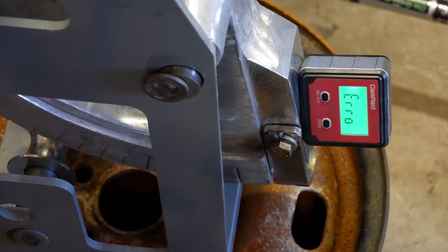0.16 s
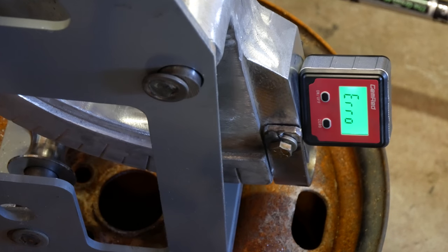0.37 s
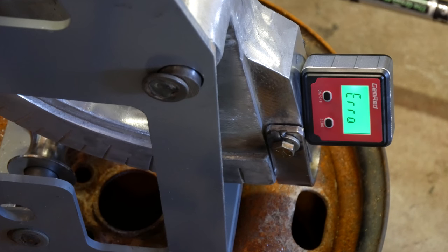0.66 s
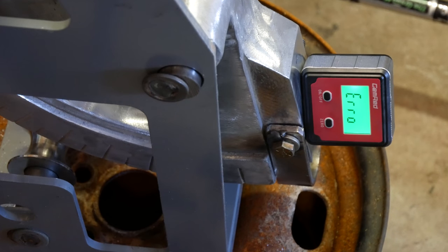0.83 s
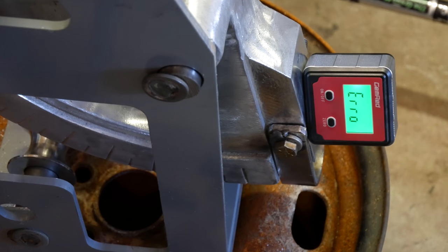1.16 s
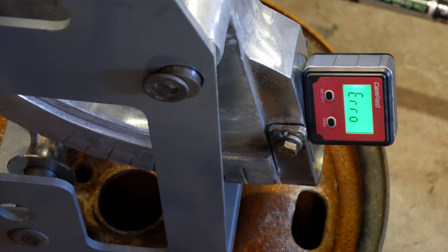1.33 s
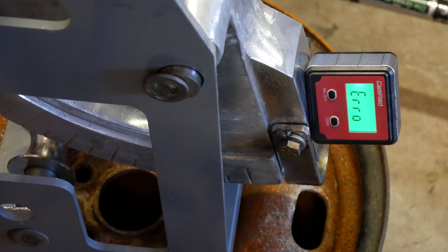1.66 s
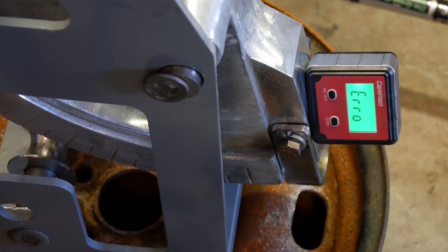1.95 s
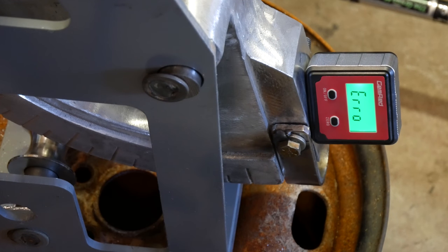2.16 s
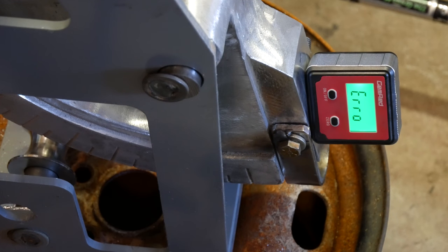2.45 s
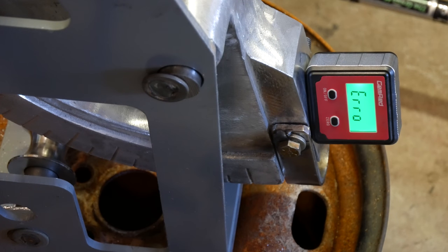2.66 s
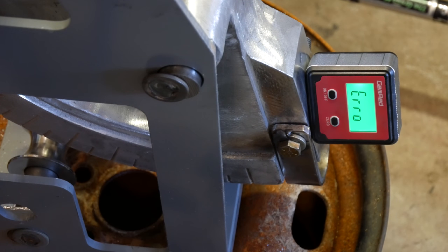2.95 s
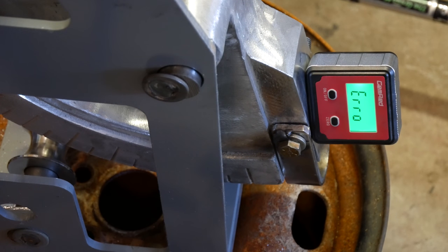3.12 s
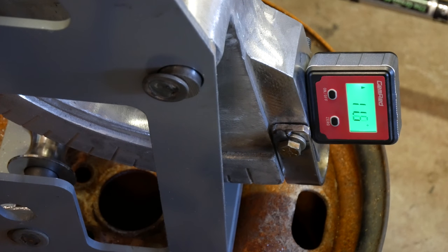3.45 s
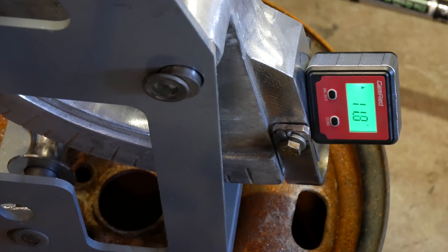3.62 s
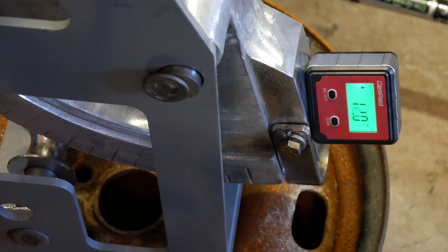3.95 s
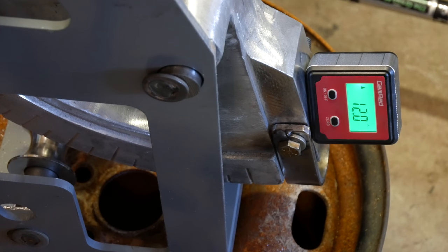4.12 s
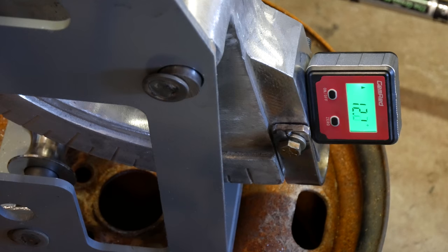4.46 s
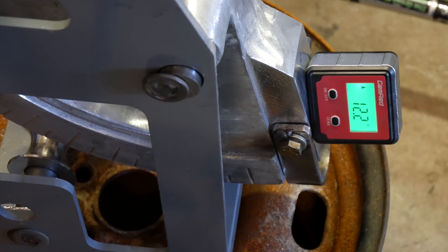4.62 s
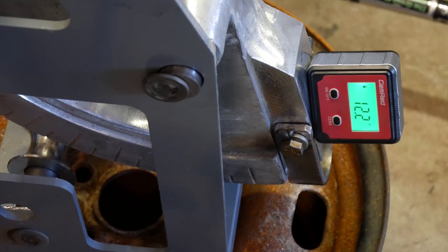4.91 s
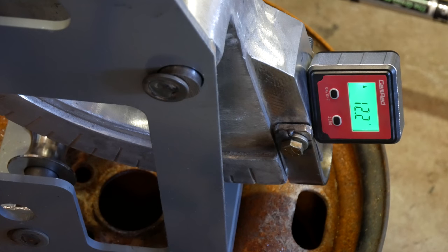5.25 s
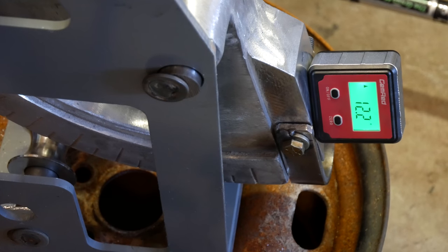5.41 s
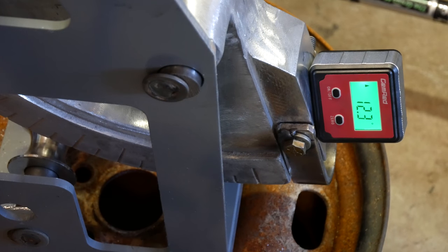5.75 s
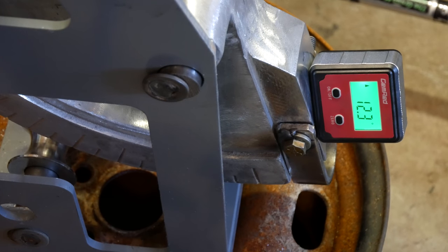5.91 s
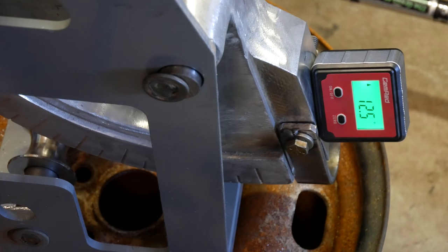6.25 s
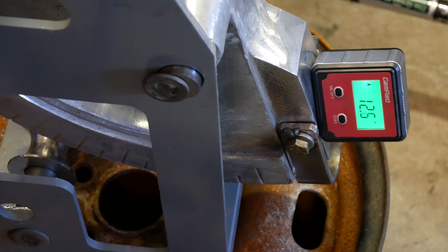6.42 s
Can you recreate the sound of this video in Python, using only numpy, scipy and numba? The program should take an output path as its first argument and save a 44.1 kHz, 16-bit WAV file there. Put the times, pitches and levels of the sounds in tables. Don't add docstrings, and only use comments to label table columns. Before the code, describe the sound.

Phone-close steel linkage: sharp dry knocks around 3 to 4 kilohertz, bright pin ticks, slapping link plates and a thin spring ping, with short room echoes. A brisk burst of pumping comes first, then over two seconds of near-silence with faint sleeve rustle and tiny taps. A loose handle clink restarts the action, and hard stop knocks alternate with lighter return rattles to the end, over low hum and hiss.

```python
import sys
import numpy as np
from scipy import signal
from scipy.io import wavfile
from scipy.ndimage import uniform_filter1d
from numba import njit

SR = 44100
rng = np.random.default_rng(int(sys.argv[2]) if len(sys.argv) > 2 else 0)


def voltage_ratio(decibels):
    exponent = np.asarray(decibels, float) / 20
    return 10 ** exponent


def persist_wave(psi):
    counts = np.round(np.clip(psi, -1, 1) * 32767).astype(np.int16)
    wavfile.write(sys.argv[1], SR, np.atleast_2d(counts).T)


N = 290178
LEAD = 13230


@njit
def ring(rows, size):
    out = np.zeros(size)
    for at, hz, t60, rise, gain, phase in rows:
        z = gain * np.exp(1j * phase)
        p = np.exp(2j * np.pi * hz / SR - np.log(1000) / (t60 * SR))
        lag, q = 1., np.exp(-1 / (rise * SR))
        for i in range(int(at), min(size, int(at + 1.2 * t60 * SR))):
            out[i] += z.imag * (1 - lag) ** 2
            z, lag = z * p, lag * q
    return out


def strike(s, db, modes, scatter_db, detune, rise_s):
    hz, mode_db, t60_s = np.transpose(modes)
    luck = rng.standard_normal((len(s), 3, len(hz)))
    start = s[:, None] * SR + LEAD
    mode_hz = hz * (1 + detune * luck[:, 1])
    gain = voltage_ratio(db + mode_db + scatter_db * luck[:, 0])
    phase = 2 * luck[:, 2]
    columns = np.broadcast_arrays(start, mode_hz, t60_s, rise_s, gain, phase)
    return np.stack(columns, axis=-1).reshape(-1, 6)


def burst(s, db, lo_hz, hi_hz, rise_s, fall_s):
    level = np.zeros(N + LEAD)
    np.add.at(level, (s * SR + LEAD).astype(int), voltage_ratio(db))
    rise, fall = np.exp(-1 / (rise_s * SR)), np.exp(-1 / (fall_s * SR))
    level = signal.lfilter([1], [1, -fall], level)
    level = signal.lfilter([1 - rise], [1, -rise], level)
    return level * band(lo_hz, hi_hz, size=N + LEAD)


def band(lo_hz, hi_hz, size=N):
    sos = signal.butter(2, [lo_hz, hi_hz], "band", fs=SR, output="sos")
    x = signal.sosfilt(sos, rng.standard_normal(size))
    return x / x.std()


def walk(rate_hz):
    k = int(SR / rate_hz)
    held = np.repeat(rng.standard_normal(N // k + 1), k)
    return 0.48 * uniform_filter1d(uniform_filter1d(held, k), k)[:N]


def stop_contacts():
    # t/s, knock peak/dB, rebound delay/s, rebound/dB
    stops = [(-0.0073, -11.5, .005, -22), (0.4918, -7, .0054, -12), (1.0251, -7, .0054, -12),
             (4.8085, -5.5, .005, -26), (5.5692, -7, .0043, -25), (6.2936, -8, .004, -24)]
    touch_colour, stop_colour, rebound_colour = (2.8, 6, -6.5), (-13, -26, -16.5), (-17.5, -25, -27.5)
    rows = []
    for s, db, gap_s, rebound_db in stops:
        rows += [(s - .046, -46.5, *touch_colour, 3500),
                 (s, db, *stop_colour, 3706),
                 (s + gap_s, rebound_db, *rebound_colour, 3600),
                 (s + 2 * gap_s, rebound_db - 14, *rebound_colour, 3600)]
    return rows


def contacts():
    # t/s, knock peak/dB, f/Hz
    socket_knocks = [(-.23, 2, 4400), (0.0911, -42, 3500), (0.2042, -34, 3450), (.226, -36.5, 3730),
                     (.24, -17, 3090), (0.2516, -28.5, 3540), (.452, -37.5, 3440), (.4623, -24.5, 3290),
                     (.481, -25, 3880), (.7153, -48.5, 3600), (.7392, -37, 3180), (.784, -23, 3200),
                     (1.0001, -27, 3140), (1.0102, -21.5, 3620), (1.2521, -36.5, 3650), (1.304, -23, 3425),
                     (3.944, -33.5, 3230), (3.948, -21.5, 3180), (4.348, -48.5, 3300), (4.354, -53.5, 2910),
                     (4.3845, -36.5, 3520), (4.791, -24, 3260), (4.798, -27.5, 3720), (5.1312, -30, 3700),
                     (5.5506, -25, 3070), (5.557, -25, 3920), (5.9067, -29, 3890)]
    # t/s, knock peak/dB, f/Hz
    link_slaps = [(.195, -44.5, 3160), (0.2315, -16.5, 4270), (0.2496, -21.5, 3600), (.473, -25.5, 3530),
                  (.725, -48.5, 3600), (0.758, -17, 4300), (.765, -22, 3330), (.991, -26, 3340),
                  (1.274, -28, 3400), (1.2994, -23, 3820), (1.313, -39.5, 3510), (3.972, -29.5, 3290),
                  (4.4038, -25, 3530), (4.44, -31, 3700), (5.1485, -26.5, 3480), (5.9288, -32.5, 3440),
                  (5.936, -30.5, 3550), (6.2761, -23, 3340), (6.287, -25, 3960)]
    # t/s, knock peak/dB, sharpness added to the pin/dB
    pin_ticks = [(.245, -39, 2), (.456, -40, 1.5), (.772, -31.5, -3.5), (.9852, -31.5, 6.5),
                 (1.281, -35.5, -2), (1.293, -30, -5), (3.958, -31, -6.5), (3.965, -36, 3.5),
                 (4.414, -39, -7), (4.429, -36.5, 7.5), (4.7693, -44, 3.5), (4.774, -34, -4),
                 (4.799, -33, 1), (5.162, -36.5, -7), (5.5321, -33, -3.5), (5.954, -35.5, -11.5),
                 (6.2532, -39, 2), (6.2592, -35.5, 8)]
    # t/s, knock peak/dB
    creaks = [(.732, -41.5), (1.245, -49), (4.757, -50), (1.262, -37.5), (1.585, -66), (1.92, -66),
              (2.208, -85), (2.915, -70), (3.56, -76), (3.986, -34.5), (4.004, -34.5), (5.175, -35.5),
              (6.239, -52), (6.52, -56)]
    # t/s, knock peak/dB, f/Hz
    taps = [(3.3473, -55.5, 4300), (3.349, -57, 4730), (3.356, -69, 4300)]
    rows = stop_contacts()
    rows += [(s, db, -13.5, -22.5, -11.5, hz) for s, db, hz in socket_knocks]
    rows += [(s, db, -1, -18.5, -12.5, hz) for s, db, hz in link_slaps]
    rows += [(s, db, 2.8, 6 + sharp_db, -6.5, 3500) for s, db, sharp_db in pin_ticks]
    rows += [(s, db, -10.5, -15, -30, hz) for s, db, hz in taps]
    rows += [(s, db, -2, -8.5, -1.5, 3500) for s, db in creaks]
    return rows


def linkage():
    # f/Hz, level/dB, t60/s
    handle_modes = [(2580, -8, .06), (3010, -0.5, 0.069), (3230, -3, 0.04), (3135, 1, 0.081),
                    (3414, 0, 0.093), (3540, -17.5, 0.2), (3720, -11, 0.058), (4040, -6.5, .12),
                    (4200, 5, 0.031), (4150, -0.5, 0.16), (4480, -3, 0.22)]
    link_modes = [(5230, -8, 0.033), (5273, -15, .1), (5500, 0, 0.041), (6250, -5.5, .06), (7330, -6, 0.07),
                  (7940, -15.5, 0.046), (9010, -13.5, .04), (9250, -17, .04)]
    pin_modes = [(9800, -11.5, 0.019), (11230, -8.5, 0.076), (11360, -8, 0.025), (12160, -8, 0.033),
                 (12280, -4.5, .03), (12900, -7.5, .02), (13900, -10, .02), (14995, -16, .04)]
    lever_modes = [(1220, -14.5, 0.0088), (1430, -11, 0.01), (1626, -8, 0.03), (1806, -3, 0.026),
                   (1854, -7, 0.094), (2185, -3.5, 0.014)]
    # f/Hz, level/dB, t60/s
    link_clack = [(4640, -7.0, 0.006), (5500, -3.0, 0.011), (7840, -11.5, 0.0033)]
    pin_click = [(11300, 4, .005), (12600, 7, .004)]
    lever_clunk = [(1682, 1.0, 0.0093), (2460, -1.0, 0.014)]

    s, db, link_db, pin_db, lever_db, hz = np.transpose(contacts())
    link_db, pin_db, lever_db = db + link_db, db + pin_db, db + lever_db
    one = np.ones_like(s)
    knock = np.transpose([s * SR + LEAD, hz, .006 * one, .0008 * one, voltage_ratio(db + 15.5), 0 * one])
    after_db = db - 0.51 * np.maximum(db + 30.5, 0)
    near_db = -6 * ((np.array(handle_modes)[:, 0] - hz[:, None]) / 550) ** 2
    handle_db = after_db[:, None] - 16.5 + np.maximum(near_db, -15)
    rows = [knock,
            strike(s, handle_db, handle_modes, 3.0, .008, 0.0014),
            strike(s, link_db[:, None] - 12.5, link_modes, 1.4, .01, 0.00027),
            strike(s, pin_db[:, None] - 6.5, pin_modes, 2.5, 0.0061, .0002),
            strike(s, lever_db[:, None] - 9.0, lever_modes, 0.89, 0.028, 0.00013),
            strike(s, link_db[:, None], link_clack, 3.1, 0.065, 0.00043),
            strike(s, pin_db[:, None], pin_click, 1.5, .04, .0004),
            strike(s, lever_db[:, None], lever_clunk, 3.1, 0.09, 0.0003)]
    chatter = burst(s, after_db - 12.5, 2800, 4400, 0.000999, 0.0094)
    chatter += burst(s, link_db - 15.5, 3200, 9000, 0.00049, .007)
    chatter += burst(s, pin_db - 14, 10500, 13500, 0.00095, 0.0033)
    chatter += burst(s, lever_db - 11.5, 1200, 3200, .0008, 0.012)
    return ring(np.concatenate(rows), N + LEAD) + chatter


def loose_handle():
    # f/Hz, level/dB, t60/s
    bar_modes = [(1865, -10, 0.26), (1924, -12.5, 0.18), (3160, -1.5, 0.3), (3120, -5.5, 0.42),
                 (3140, -2.5, 0.33), (3240, -8, .3), (3320, -2.5, 0.15), (3620, -5.5, .2), (5386, -6, 0.28),
                 (5330, -8, 0.2)]
    # t/s, level/dB
    bar_hits = [(3.945, -35.5), (3.9515, -40.5), (3.974, -41), (4.005, -52.5)]
    # f/Hz, level/dB, t60/s
    free_modes = [(3400, -4, 0.29), (3500, -1, .38), (3530, -3, 0.34), (3600, -3, 0.31), (3690, -6, .3)]
    s, db = np.transpose(bar_hits)
    rows = [strike(s, db[:, None], bar_modes, 2.5, 0.004, 0.00048),
            strike(np.array([1.303]), -44, free_modes, 1.5, .002, .002)]
    return ring(np.concatenate(rows), N + LEAD)


def valve_spring():
    # t/s, level/dB
    twangs = [(.451, -36), (.762, -23.5), (.985, -26), (1.281, -65), (3.972, -30), (4.414, -46.5),
              (4.767, -35.5), (5.164, -42), (5.522, -39), (5.938, -42.5), (6.256, -30.5)]
    s, db = np.transpose(twangs)
    return ring(strike(s, db[:, None], [(6290, -0.5, 0.06)], 0, .0005, .002), N + LEAD)


def frame():
    # f/Hz, t60/s
    frame_modes = [(140, 0.19), (224, 0.16), (265, 0.25), (367, 0.21), (440, 0.14)]
    # t/s, peak/dB, upper modes/dB, lowest mode/dB, main mode/dB
    thumps = [(-.035, -38.5, -8.5, -18, -9.5), (0.229, -37, -10.5, -18.5, -6.5),
              (0.492, -35.5, -8, -18, -6), (0.759, -37, -14, -10, -11.5), (1.022, -37, -10.5, -17, -5.5),
              (1.301, -38, -14, -10, -18), (2.208, -61, -18, -4, -7.5), (3.967, -41, -13.5, -9, -7.5),
              (4.439, -40.5, -5.5, -14.5, -10), (4.809, -35.5, -17.5, -17, -9),
              (5.152, -40, -14, -31.5, -7), (5.576, -38.5, -24.5, -23, -5.5), (5.929, -39, -13, -21.5, -7),
              (6.289, -38, -18.5, -34, 1)]
    s, db, upper_db, low_db, main_db = np.transpose(thumps)
    share_db = np.transpose([low_db - 1, 0 * s - 9, main_db + 2.0, upper_db + 6.5, upper_db - 4])
    mode_db = db[:, None] + share_db
    modes = [(hz, 0, t60_s) for hz, t60_s in frame_modes]
    rows = [strike(s, mode_db, modes, 0.94, .012, 0.014),
            strike(s + .018, mode_db - 14, modes, 2.3, 0.027, 0.0027)]
    shudder = burst(s - .02, db - 7, 87, 480, 0.018, 0.027)
    return ring(np.concatenate(rows), N + LEAD) + shudder


def walls(x):
    shop_bands = [(60, 700, 0.56, -26.5), (705, 3200, 0.46, -25), (2500, 6210, 0.56, -28),
                  (5970, 12000, 0.36, -21), (10000, 21000, 0.14, -23)]
    t = np.arange(SR) / SR
    tail = 0
    for lo_hz, hi_hz, t60_s, db in shop_bands:
        tail = tail + voltage_ratio(db - 25.5 - 60 * t / t60_s) * band(lo_hz, hi_hz, size=SR)
    build_up = np.clip(t / 0.0044, 0, 1) ** 2
    return signal.fftconvolve(x, tail * build_up)[LEAD:N + LEAD]


def rustle():
    brushes = [(2.45, .85, -89), (3.35, .08, -86), (3.628, 0.18, -78), (3.8, 0.21, -82)]
    t = np.arange(N) / SR
    level = 0
    for s, length_s, db in brushes:
        inside_s = np.minimum(t - s, s + length_s - t)
        level = level + voltage_ratio(db) * np.clip(inside_s / 0.047, 0, 1)
    return level * voltage_ratio(2.5 * walk(30.2)) * band(2630, 3930)


def vehicle():
    # t/s, f/Hz, level/dB
    drone = [(4.15, 79, -74.5), (4.788, 81.6, -61.5), (4.88, 87.7, -61.5), (5.494, 85.25, -66),
             (5.72, 84.5, -63), (5.828, 90.2, -68.5), (6.0, 73.5, -84)]
    t = np.arange(N) / SR
    s, hz, db = np.transpose(drone)
    phase = 2 * np.pi * np.cumsum(np.interp(t, s, hz)) / SR
    level = voltage_ratio(np.interp(t, s, db, left=-120, right=-120) + 6 + 2.3 * walk(20))
    return level * (np.sin(phase) + voltage_ratio(-15.0) * np.sin(2 * phase))


def lamps():
    # f/Hz, level/dB
    lines = [(129.2, -78), (253.0, -80), (635.2, -88.5), (759.0, -87), (1200, -88.5), (1561, -91)]
    out = 0
    for hz, db in lines:
        level = voltage_ratio(db + 4.0 + 0.83 * walk(4.054))
        phase = 2 * np.pi * np.cumsum(hz * (1 + 0.0053 * walk(14))) / SR
        out = out + level * np.sin(phase)
    return out


def shop_air():
    # f/Hz, density/dB per Hz
    air_spectrum = [(20, -4.5), (40, -2.5), (70, 1.5), (130, 0), (250, -8), (450, -14), (800, -19),
                    (1500, -25), (2500, -31), (3500, -27), (5500, -33), (9000, -46), (12500, -41),
                    (15000, -42.5)]
    hz, db = np.transpose(air_spectrum)
    out = 0
    for lo_hz in 20 * 2 ** np.arange(0, 9.6, .5):
        level_db = np.interp(np.log(lo_hz * 1.6), np.log(hz), db) + 10 * np.log10(lo_hz) + 0.57 * walk(5)
        hi_hz = lo_hz * np.sqrt(2)
        mid, side = band(lo_hz, hi_hz), band(lo_hz, hi_hz)
        out = out + voltage_ratio(level_db) * (mid + voltage_ratio(-23.5) * side * np.array([[1], [-1]]))
    return out * voltage_ratio(-67.5) / out.std()


def scene():
    steel = linkage() + loose_handle() + valve_spring() + frame()
    echo = walls(steel)
    treble = signal.sosfilt(signal.butter(2, 7000, "high", fs=SR, output="sos"), echo)
    side = voltage_ratio(-18.5) * echo + voltage_ratio(-18.0) * treble
    background = rustle() + vehicle() + lamps() + shop_air()
    return steel[LEAD:] + walls(steel) + np.array([side, -side]) + background


def top_cut(x):
    return signal.sosfilt(signal.butter(12, 16620, fs=SR, output="sos"), x)


def record(dry):
    hiss_sos = signal.ellip(8, .2, 30, 12900, fs=SR, output="sos")
    hiss = signal.sosfilt(hiss_sos, rng.standard_normal((2, N)))
    top_sos = signal.butter(10, 15600, fs=SR, output="sos")
    mix = signal.sosfilt(top_sos, dry + voltage_ratio(-78) * hiss)
    return top_cut(mix)


dry = scene()
out = record(dry)
persist_wave(out)
```